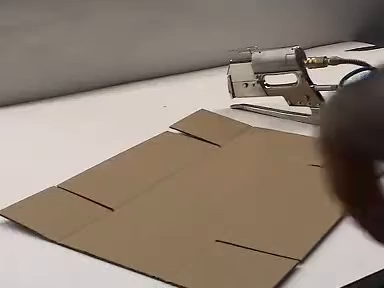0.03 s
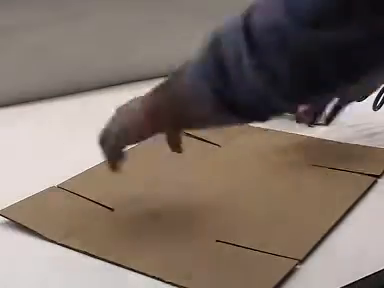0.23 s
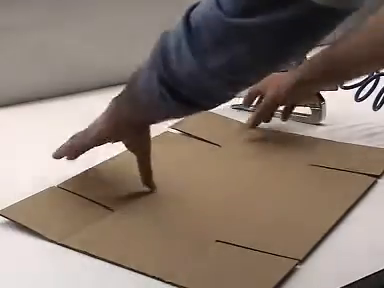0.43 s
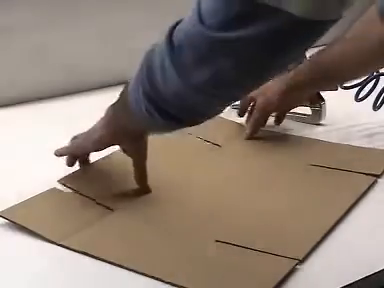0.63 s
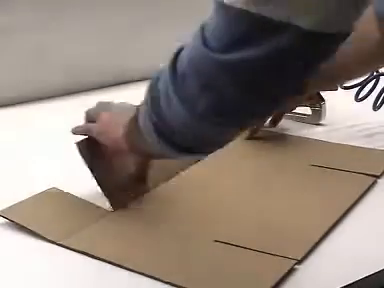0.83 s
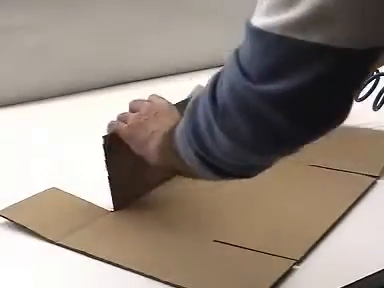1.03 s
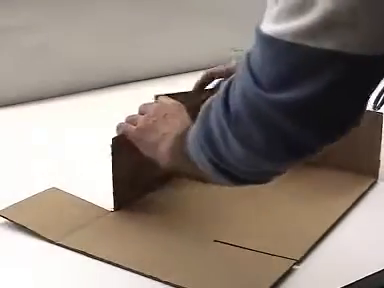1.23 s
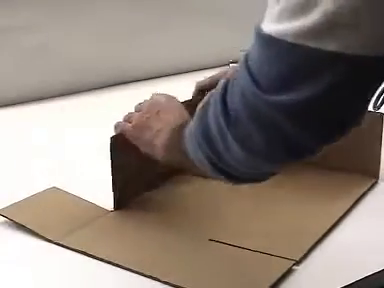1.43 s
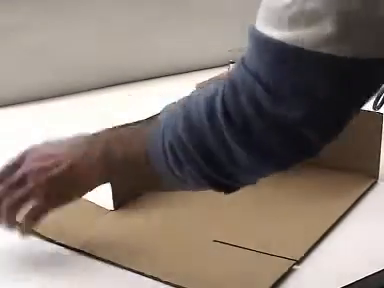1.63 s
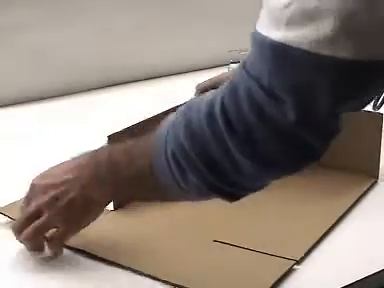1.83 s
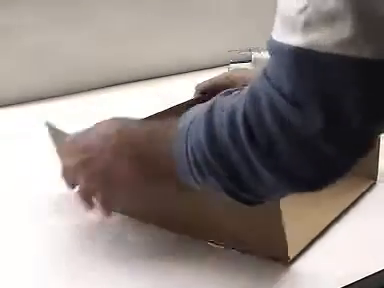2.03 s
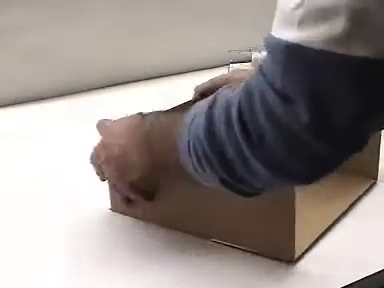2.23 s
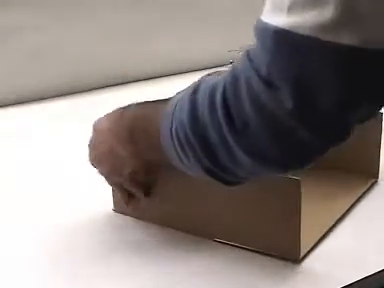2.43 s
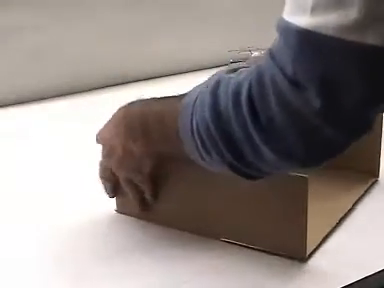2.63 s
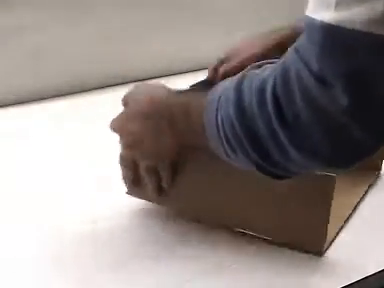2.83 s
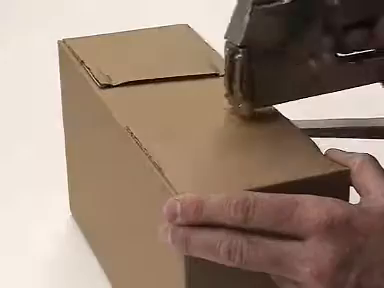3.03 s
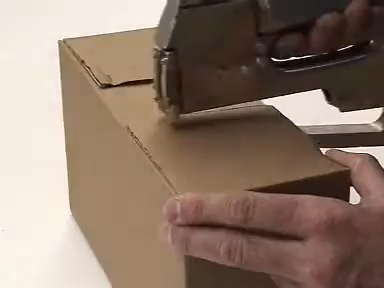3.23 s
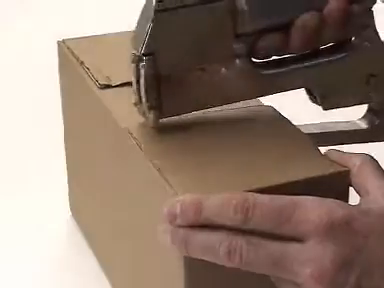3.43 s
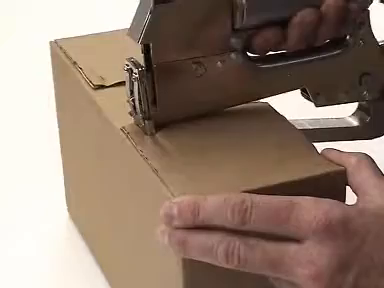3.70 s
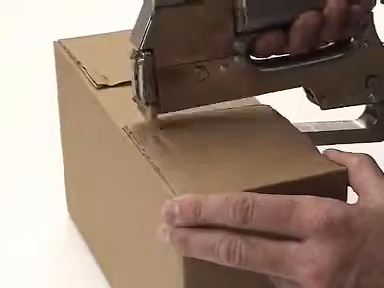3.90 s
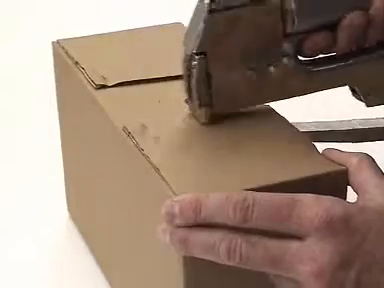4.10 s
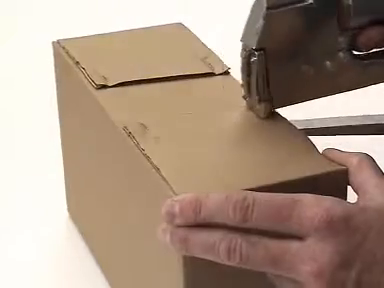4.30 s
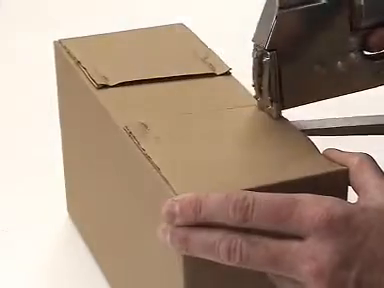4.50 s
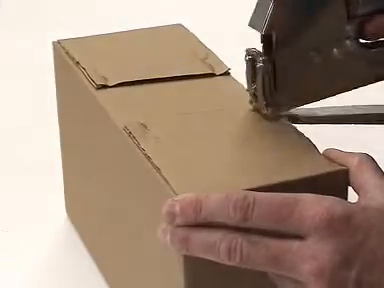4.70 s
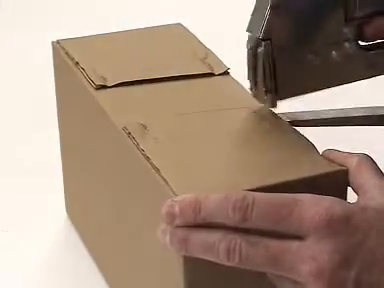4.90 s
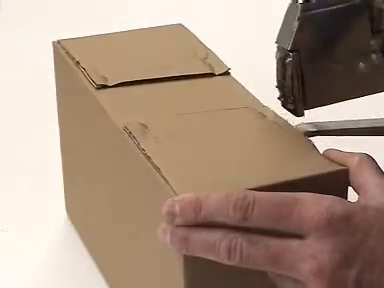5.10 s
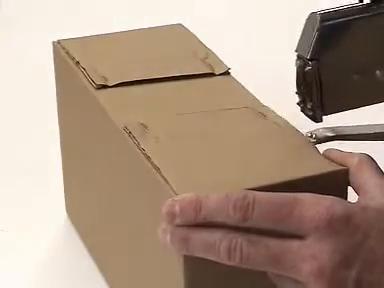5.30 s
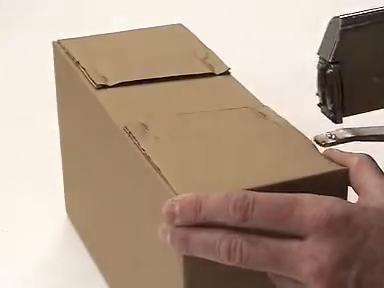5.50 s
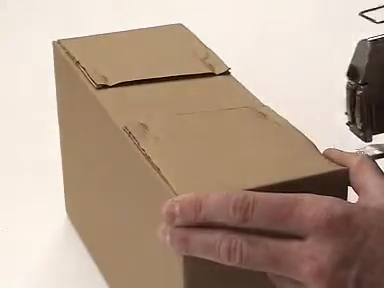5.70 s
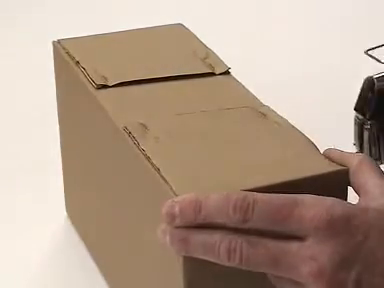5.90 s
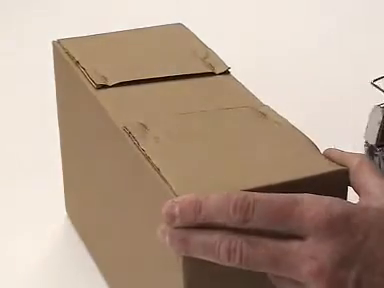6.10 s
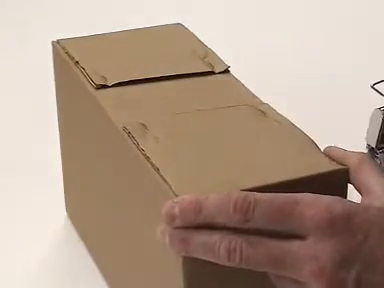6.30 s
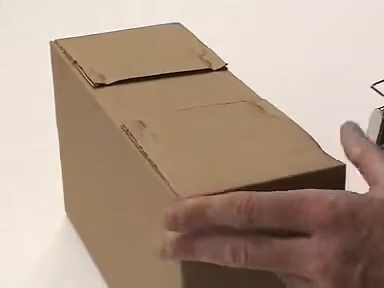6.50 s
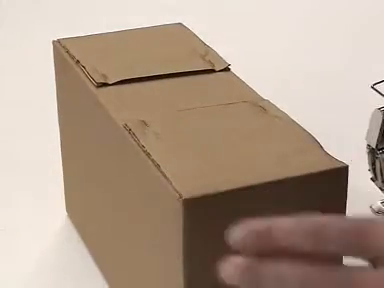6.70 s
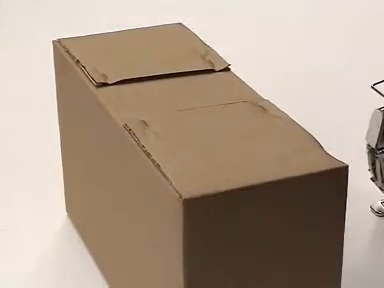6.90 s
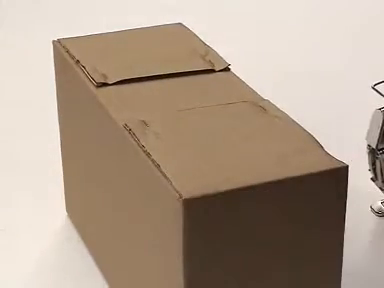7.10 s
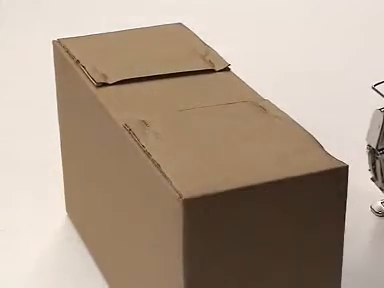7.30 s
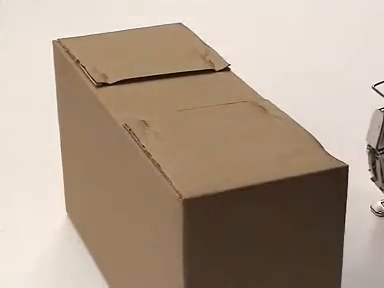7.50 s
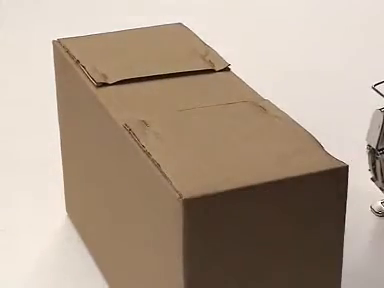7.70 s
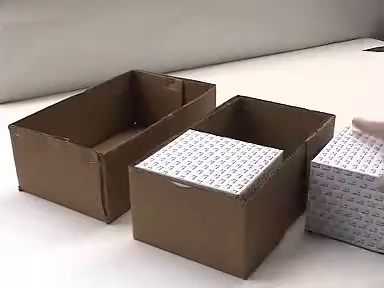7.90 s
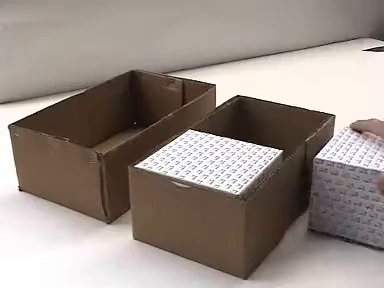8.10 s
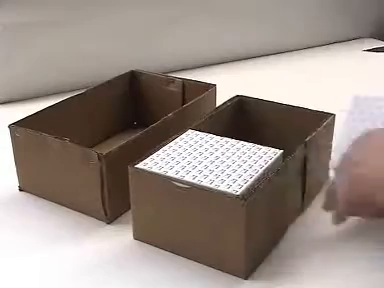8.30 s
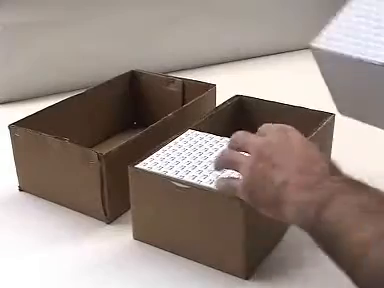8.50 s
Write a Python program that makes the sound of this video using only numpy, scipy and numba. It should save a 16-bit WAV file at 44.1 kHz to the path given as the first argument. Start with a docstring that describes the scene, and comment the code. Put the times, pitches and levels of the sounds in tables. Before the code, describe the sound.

Cardboard is folded with scrapes and two loud hollow snaps, then a pneumatic stapler fires twice with hissing exhaust in a humming workshop.

```python
"""Workshop hall, at a work table: a cardboard blank is folded into a box, creases snapping, flaps scraping.
A pneumatic stapling plier fires twice (blow, rush of air, exhaust, piston return), is laid down, and a box is set down.
Struck board, tool and table are decaying modes; sliding is random slips through resonances; air is coloured noise.
Close, narrow-band microphone, overloading on the loud hits; machines hum farther off in the hall."""
import sys
import numpy as np
from scipy import signal
from scipy.fft import rfft, irfft, next_fast_len
from scipy.io import wavfile
from numba import njit

SR = 44100
rng = np.random.default_rng(int(sys.argv[2]) if len(sys.argv) > 2 else 0)


def to_wav(sig):
    """Store sig (one row per channel, or 1-D mono) as 16-bit WAV at the path in sys.argv[1].

    Samples outside -1..1 are clipped; the rate is SR.
    """
    pcm = np.clip(np.atleast_2d(sig), -1, 1) * 32767
    pcm = np.round(pcm).astype(np.int16)
    wavfile.write(sys.argv[1], SR, pcm.T)  # frames by channels


N = 376613
T = np.arange(N) / SR
BAND_HZ, TOP_HZ = 5500, 15900  # nominal upper edge of the microphone's band; final low-pass


def amp(db):
    """Decibels to gain."""
    return 10 ** (np.asarray(db) / 20)


def unit(x):
    """Scale to rms 1."""
    return x / np.sqrt(np.mean(x ** 2))


def fade(t, t60):
    """Exponential decay from t = 0, silent before."""
    return (t >= 0) * np.exp(-np.log(1000) * np.abs(t) / t60)


def add(out, s, x):
    """Mix x into out from s seconds on."""
    i = int(s * SR)
    out[i:i + len(x)] += x[:N - i]


def thin(x, hz):
    """Small, light things radiate little below hz."""
    return signal.sosfilt(signal.butter(2, hz, "high", fs=SR, output="sos"), x)


def colour(x, points):
    """Give x a spectrum of (f/Hz, level/dB) points, rolled off above the band, at rms 1."""
    hz, db = np.transpose(points)
    size = next_fast_len(len(x))
    f = np.maximum(np.fft.rfftfreq(size, 1 / SR), 1)
    shape = amp(np.interp(np.log(f), np.log(hz), db))
    roll_off = 1 / (1 + (f / (BAND_HZ + 1000)) ** 20)
    return unit(irfft(rfft(x, size) * shape * roll_off, size)[:len(x)])


def resonate(x, hz, width):
    """One resonance, gain 1 at its centre."""
    return signal.lfilter(*signal.iirpeak(hz, hz / width, fs=SR), x)


@njit
def glide(x, hz, width):
    """A resonance whose centre moves: a state-variable band-pass, retuned at every sample."""
    y, band, low = np.empty(len(x)), 0., 0.
    for i in range(len(x)):
        g, k = np.tan(np.pi * hz[i] / SR), width / hz[i]
        v = (band + g * (x[i] - low)) / (1 + g * (g + k))
        band, low, y[i] = 2 * v - band, low + 2 * g * v, k * v
    return y


def ring(t, modes):
    """Struck (f/Hz, level/dB, t60/s) modes; each blow lands a little differently."""
    out = 0
    for hz, db, t60 in modes:
        level_chance, pitch_chance = rng.standard_normal(2)
        tone = np.sin(2 * np.pi * hz * (1 + 0.0033 * pitch_chance) * t)
        out = out + amp(db + 1.0 * level_chance) * fade(t, t60) * tone
    return out


def walk(rate):
    """Smooth chance with a spread near 1, from `rate` random points a second."""
    return 1.2 * np.interp(T * rate, np.arange(4096), rng.standard_normal(4096))


def slips(rate, spread_db):
    """Stick-slip: about `rate` random clicks a second, more unequal in size as spread_db grows."""
    clicks = (rng.random(N) < rate / SR) * rng.standard_normal(N)
    return unit(clicks * amp(spread_db * np.minimum(rng.exponential(size=N), 4)))


def stroke(s, length, change_db, grip_s=0.0063, let_go_s=0.015):
    """Gain of one sliding stroke: grip, an even change of level in dB, let go."""
    t = T - s
    grip = np.clip(t / grip_s, 0, 1)
    let_go = np.clip((length - t) / let_go_s + 1, 0, 1)
    return amp(change_db * np.clip(t / length, 0, 1)) * grip * let_go


# air of the hall, spectrum: (f/Hz, relative level/dB)
HALL_AIR = [(15, -50), (25, -11.5), (146, -3.5), (174, -6), (273, -7), (319, -10), (460, -7.5), (570, -11),
            (623, -10.5), (797, -12.5), (900, -10.5), (1250, -9), (1390, -11.5), (1560, -10.5), (1850, -15),
            (2380, -18.5), (5200, -23), (6760, -44), (11400, -120)]
# distant machine tones: (f/Hz, mean rms level/dB)
MACHINE_TONES = [(150, -57), (1200, -55), (1280, -55.5), (1502, -56.5)]
# two chirps on every turn of a distant machine: (t after the turn begins/s, f/Hz, level/dB)
TURN_CHIRPS = [(0, 1540, -42.5), (.022, 1270, -43)]
TURNS_PER_S, TURN_BEGINS_S, CHIRP_S, CHIRP_WIDTH_HZ = 11.95, 7.053, .008, 180


def hall(air_db=-41.5, waver_db=0.36, hum_waver_db=3):
    """Ventilation noise, the wavering tones of distant machines and the chirping of one that turns."""
    out = colour(rng.standard_normal(N), HALL_AIR) * amp(air_db + waver_db * walk(3.7))
    for hz, db in MACHINE_TONES:
        level = amp(db + hum_waver_db * walk(6.1)) * np.sqrt(2)
        out = out + level * np.sin(2 * np.pi * hz * T + 1.1 * walk(9))
    for lag, hz, db in TURN_CHIRPS:
        # time from the nearest chirp
        off_s = (((T - TURN_BEGINS_S - lag) * TURNS_PER_S + .5) % 1 - .5) / TURNS_PER_S
        narrowed = resonate(rng.standard_normal(N), hz, CHIRP_WIDTH_HZ)
        squeak = unit(resonate(narrowed, hz, 2 * CHIRP_WIDTH_HZ))
        out = out + amp(db) * np.exp(-(off_s / CHIRP_S) ** 2) * squeak
    return out


# hiss of the fibres, spectrum: (f/Hz, relative level/dB)
FIBRE_HISS = [(100, -29), (400, -9), (1000, 4), (1600, 2.5), (2200, 0.5), (2900, 0), (3600, -1.5),
              (5500, -8.5)]


def rubbing(strokes, resonances, judder_db, flex, low_hz):
    """Coarse slips shake the board's resonances, which wander as it flexes; fine ones hiss; the hand judders both."""
    body_gain, hiss_gain = np.zeros(N), np.zeros(N)
    for s, length, body_db, hiss_db, change_db in strokes:
        gain = stroke(s, length, change_db)
        body_gain += amp(body_db) * gain
        hiss_gain += amp(hiss_db) * gain
    coarse, body = slips(rate=2500, spread_db=1.5), 0
    for hz, width, db in resonances:
        centre = hz * np.exp(flex * walk(25))
        body = body + amp(db) * glide(coarse, centre, float(width))
    body = unit(thin(body, hz=low_hz))
    hiss = colour(slips(rate=8400, spread_db=0.0) + 0.55 * coarse, FIBRE_HISS)
    return unit(amp(judder_db * walk(110))) * (body_gain * body + hiss_gain * hiss)


# board sliding on board: (t/s, length/s, body level/dB, fibre hiss level/dB, change over the stroke/dB)
FOLDING_STROKES = [(0, 0.17, -38.5, -35.5, -14.5), (.63, 0.11, -36.5, -37.5, -6.5),
                   (.86, 0.066, -42, -40.5, 2), (.935, 0.25, -38, -32.5, -9), (1.185, 0.22, -39, -42, -5),
                   (1.335, 0.042, -15.5, -24, -0.5), (1.385, .115, -25.5, -20.5, -2.5),
                   (1.505, 0.095, -25.5, -22, 2), (1.6, 0.097, -23, -25.5, -11.5),
                   (1.845, .06, -39.5, -27.5, -5), (1.89, 0.12, -34.5, -44, -4.5),
                   (2.03, 0.026, -38, -27, 1.5), (2.06, 0.19, -35.5, -39, 2.5),
                   (2.213, 0.047, -15.5, -15.5, -11), (2.265, 0.29, -19, -38.5, -14),
                   (2.535, 0.21, -30, -35, -4), (2.76, 0.206, -34, -30, -1), (2.89, 0.042, -24, -54, -8.5)]
# resonances of the open blank: (f/Hz, width/Hz, relative level/dB)
BLANK_RESONANCES = [(130, 90, -9.5), (260, 65, -2.5), (492, 118, 20), (650, 150, -6), (960, 200, -8),
                    (1420, 210, -18.5)]


def folding():
    """The open blank rubs on itself while it is folded, its resonances wandering widely."""
    return rubbing(FOLDING_STROKES, BLANK_RESONANCES, judder_db=1.0, flex=0.1, low_hz=110)


# an edge or a hand dragged along a panel:
# (t/s, length/s, first f/Hz, last f/Hz, width/Hz, level/dB, change over the stroke/dB, overtone level/dB)
PANEL_SWIPES = [(0.218, 0.1, 1170, 1070, 610, -35.5, -3.5, -22),
                (1.345, 0.039, 1570, 1376, 80, -14.5, -2, -13), (1.383, .165, 1420, 1420, 130, -20, -11, 8),
                (1.327, .16, 350, 305, 110, -23, -5, -11.5), (1.45, 0.023, 1520, 1500, 250, -15.5, -6, -16),
                (1.809, 0.039, 1700, 2000, 755, -35.5, 11, -8),
                (1.843, .11, 2240, 1380, 596, -23.5, -2.5, -10),
                (1.959, 0.1, 1350, 1210, 400, -31.5, -4.5, -9),
                (3.257, 0.1, 800, 776, 560, -30.5, -6, -14.5), (3.557, 0.097, 945, 1056, 600, -35, 3, -29),
                (6.85, 0.18, 1050, 1120, 500, -38, -9, -31)]


def swipes(judder_db=0.0, settle_share=0.42):
    """The free length of the panel changes as the contact slides and slows, and its resonance follows."""
    out = 0
    grit = signal.lfilter([1], [1, -.7], slips(rate=7000, spread_db=0.5))
    for s, length, first_hz, last_hz, width_hz, db, change_db, overtone_db in PANEL_SWIPES:
        # settle_share: time constant of the glide as a share of the swipe's length
        travel = np.clip(T - s, 0, length) / (settle_share * length)
        centre = last_hz + (first_hz - last_hz) * np.exp(-travel)
        fundamental = glide(glide(grit, centre, float(width_hz)), centre, 4. * width_hz)
        overtone = glide(grit, 2 * centre, 2. * width_hz)
        sung = unit(fundamental + amp(overtone_db) * overtone)
        out = out + amp(db) * stroke(s, length, change_db) * sung
    return out * unit(amp(judder_db * walk(120)))


# modes of a panel: (multiple of its pitch, level/dB, share of the ring time)
PANEL_MODES = [(1, 0.5, 0.75), (.8, -24, 0.28), (1.22, -12.5, 1.4), (.55, -19.5, 0.66), (1.75, -11.5, 0.54),
               (2.7, -16, 0.39)]


def panel(t, hz, t60):
    """A struck cardboard panel rings like a slack drum."""
    return ring(t, [(hz * k, db, t60 * share) for k, db, share in PANEL_MODES])


# crack of the paper fibres, spectrum: (f/Hz, relative level/dB)
FIBRE_CRACK = [(100, -12), (500, -6.5), (1500, 1), (2500, -7.5), (4000, -5), (5500, -19.5)]


def crack_noise(t):
    """Breaking or struck fibres give noise of one colour, before any decay."""
    return colour(rng.standard_normal(len(t)), FIBRE_CRACK)


def flutes(count=5, start_s=2.582, gap_s=.025, slowing=1.05, crack_db=2.5, seated_crack_db=-11):
    """A flap edge ticks over the flutes of the board, slowing and losing its crack as it seats."""
    k = np.arange(count)
    gaps = gap_s * slowing ** k
    times = start_s + np.cumsum(gaps) - gaps
    cracks = crack_db + (seated_crack_db - crack_db) * (k / k[-1]) ** 2
    level_db, pitch_hz, t60_s = -18, 532, 0.054
    return [(s, level_db, pitch_hz, t60_s, db) for s, db in zip(times, cracks)]


# panels snapping and being tapped: (t/s, level/dB, panel f/Hz, ring t60/s, crack relative to the ring/dB)
PANEL_SNAPS = [(.461, -29, 700, .035, -13), (.551, -30, 670, .07, -18), (.599, -20, 1080, 0.022, -12),
               (.635, -31.5, 804, .03, 0.5), (.666, -24, 606, .04, -25), (1.312, 9.5, 527.5, 0.086, -19),
               (1.457, -7, 487, 0.2, -13), (1.509, -13.5, 934, 0.087, -3), (1.586, -16.5, 517, .11, -9.5),
               (2.049, -11, 510, 0.09, -18), (2.139, -11, 526, .069, -5.5), (2.182, -13, 538, 0.16, -5),
               (2.198, -5, 904, 0.029, -7), (2.205, 12, 563, 0.045, -11), (2.310, -16, 560, 0.026, -24),
               (2.530, -12, 502, 0.035, -13.5), (2.541, -16, 516, 0.039, -4), (2.905, -18, 495, 0.15, -14),
               (2.971, -14.5, 452, 0.063, -19), (3.414, -8.5, 405, 0.033, -24),
               (7.984, -11, 362, 0.03, -23), (7.997, -16, 481, 0.09, -19), (8.090, -24.5, 250, 0.14, -23),
               (8.342, -24.5, 482, 0.05, -12)]


def snaps(crack_t60=0.025):
    """A crease gives way: the fibres crack and the panel rings."""
    out, t = np.zeros(N), T[:SR // 3]
    for s, db, hz, t60, crack_db in list(PANEL_SNAPS) + flutes():
        crack = crack_noise(t) * fade(t, crack_t60)
        add(out, s, amp(db) * (panel(t, hz, t60) + amp(crack_db) * crack))
    return thin(out, hz=215)


# finished box under hand and tool: (t/s, length/s, body level/dB, fibre hiss level/dB, change over the stroke/dB)
SHIFTING_STROKES = [(3.0, 0.11, -40, -59, -3.5), (3.105, 0.33, -35.5, -46.5, -4),
                    (3.44, .17, -35.5, -58, 0), (3.62, 0.047, -42, -44, 7), (4.2, 0.055, -35.5, -41, 5),
                    (4.26, 0.18, -27, -33, -17.5), (6.46, 0.22, -35, -54, -1.5),
                    (8.03, 0.13, -35.5, -49, 1.5), (8.19, .06, -42.5, -44.5, 4),
                    (8.255, 0.051, -30, -40.5, -2), (8.31, 0.16, -35.5, -44, -7)]
# resonances of the hollow box: (f/Hz, width/Hz, relative level/dB)
BOX_RESONANCES = [(96.4, 40, -3.5), (203, 63, -5), (293, 95, -2.5), (440, 42, 7), (514, 82, -4),
                  (895, 190, -32)]


def shifting():
    """The finished box slides; its hollow resonances hold steadier than those of the open blank."""
    return rubbing(SHIFTING_STROKES, BOX_RESONANCES, judder_db=2.0, flex=0.018, low_hz=75)


# modes of the table top: (f/Hz, level/dB, t60/s)
TABLE_MODES = [(93, -7.5, 0.48), (183.3, -6.5, 0.58), (237, -8, 0.22), (305, -15, 0.059), (393, -12, .08),
               (446, -28, 1), (484, 6.5, 0.22), (590, -6.5, 0.14), (696, -9, 0.3), (1207, -16.5, 0.93)]
# clack of the contact, spectrum: (f/Hz, relative level/dB)
CONTACT_CLACK = [(30, -15.5), (120, 2.5), (450, 0.5), (1000, -9.5), (2000, -9.5), (3500, -20), (5500, -33)]
# plier and boxes bump against the table: (t/s, level/dB, clack relative to the boom/dB)
TABLE_KNOCKS = [(3.411, -29.5, 5.5), (6.233, -29.5, 11), (6.243, -27, 11.5), (6.255, -23.5, 9),
                (6.277, -28.5, 4), (6.297, -30, 8), (6.615, -33, -3), (6.637, -34, 0.5), (7.985, -32, 4.5)]


def knocks(clack_t60=0.048, rattle_db=-13, rattle_t60=0.62):
    """Plier and boxes meet the table: a clack of contact and a dying rattle over the boom of the top."""
    out, t = np.zeros(N), T[:SR]
    for s, db, clack_db in TABLE_KNOCKS:
        decay = fade(t, clack_t60) + amp(rattle_db) * fade(t, rattle_t60)
        clack = colour(rng.standard_normal(len(t)), CONTACT_CLACK) * decay
        add(out, s, amp(db) * (ring(t, TABLE_MODES) + amp(clack_db) * clack))
    return thin(out, hz=60)


def box_thump(t):
    """The box panel thumps when the driver or the returning piston shakes it."""
    return panel(t, hz=405, t60=0.061)


# modes of the plier and of the box in its jaws: (f/Hz, level/dB, t60/s)
PLIER_MODES = [(335, -18, 0.039), (403, -12, 0.11), (440, -4, 0.42), (577, -12.5, 0.38), (717, -12.5, 0.26),
               (809, -8.5, 0.25), (873, -16, 0.39), (1005, -8, 0.34), (1243, -11, .3), (1334, -18, 0.35),
               (1800, -19.5, 0.64), (2008, -19.5, 0.5), (2100, -17, 0.47), (4750, -22, 0.44)]


def blow(t, crack, ring_db, crack_db, thump_db=2.5, table_db=-19):
    """The driver slams the staple home: fibres crack, tool and box ring, the table shakes."""
    tool = amp(ring_db) * ring(t, PLIER_MODES) * (1 - fade(t, 0.052))  # the modes take time to build
    shaken = amp(thump_db) * box_thump(t) + amp(table_db) * ring(t, TABLE_MODES)
    return tool + amp(crack_db) * crack * fade(t, 0.064) + shaken * (1 - fade(t, .012))


# roar of the air and of the shaken tool, spectrum: (f/Hz, relative level/dB)
AIR_ROAR = [(30, -26), (100, -9.5), (180, -4), (280, -10), (450, 0.5), (950, -1.5), (1350, -8.5),
            (2100, -3), (2800, -9), (4000, -10.5), (5500, -17.5)]


def air_rush(t, air, open_s, t60, low_hz, high_hz, roar_db, low_width=150, high_width=120, high_db=0, swell_s=0.023):
    """Rushing air sounds two cavity resonances under a broad roar until the valve shuts it off."""
    low = unit(resonate(resonate(air, low_hz, low_width), low_hz, 4 * low_width))
    high = unit(resonate(resonate(air, high_hz, high_width), high_hz, 4 * high_width))
    cavity = unit(low + amp(high_db) * high)
    roar = colour(rng.standard_normal(len(t)), AIR_ROAR)
    valve = np.minimum(t / swell_s, 1) * np.clip((open_s - t) / .004 + 1, 0, 1)
    return valve * fade(t, t60) * (cavity + amp(roar_db) * roar)


# exhaust jet, spectrum: (f/Hz, relative level/dB)
EXHAUST_JET = [(150, -18.5), (500, -27.5), (1200, -13), (2200, -7.5), (3300, -8), (4700, -6), (5500, -12)]


def exhaust(t, jet, port, travel_s, swell_db, spit_db=3, vent_t60=0.6):
    """The port opens with a spit; the jet swells until the piston is home, then dies away."""
    swell = amp(np.interp(t, [0, travel_s], [-swell_db, 0]))
    flow = swell * fade(np.maximum(t - travel_s, 0), vent_t60)
    return amp(spit_db) * port * fade(t, 0.1) + flow * colour(jet, EXHAUST_JET)


def exhaust_puff(t, air):
    """A low puff of air as the port opens."""
    return colour(air, [(25, 8), (70, -4.0), (200, -30), (1000, -72)]) * fade(t, 0.072)


def piston_return(t, crack, seat_db=-9, ring_db=-12, thump_db=-5):
    """The piston seats with a tick and shakes tool and box once more."""
    shake = amp(ring_db) * ring(t, PLIER_MODES) + amp(thump_db) * box_thump(t)
    return shake + crack * (fade(t, 0.16) + amp(seat_db) * fade(t, 0.013))


def anvil_arm(t, hz=150.0, t60=1.78):
    """Freed from the box, the long anvil arm hums on."""
    return np.sin(2 * np.pi * hz * t) * fade(t, t60)


# staple shots: (fire t/s, trigger release t/s, piston home t/s, crack level/dB, ring level/dB, rush level/dB,
# rush t60/s, low resonance f/Hz, high resonance f/Hz, roar relative to the resonances/dB, exhaust level/dB,
# exhaust swell/dB, return level/dB)
STAPLE_SHOTS = [(3.669, 3.884, 3.959, 0.5, 3, -5.5, 0.86, 705, 1304, 4.5, -14, 10.5, -13.5),
                (4.695, 4.919, 4.982, -3, -10, -3.5, 0.67, 536, 1272, -5.5, -18, 3, -13.5)]


def stapler(leak_db=-36, leak_lead_s=0.023, puff_db=-12, arm_db=-32):
    """The driver slams home, air rushes until the trigger is let go, then the cylinder vents and the piston returns."""
    out, draught, t = np.zeros(N), np.zeros(N), T[:int(1.5 * SR)]
    for (fire, release, home, crack_db, ring_db, rush_db, rush_t60, low_hz, high_hz,
         roar_db, vent_db, swell_db, home_db) in STAPLE_SHOTS:
        air, jet = rng.standard_normal((2, len(t)))
        crack, port = crack_noise(t), unit(resonate(jet, 4500, 700))
        # the trigger valve starts to leak just before the blow
        add(out, fire - leak_lead_s, amp(leak_db) * port * fade(t, 0.26))
        add(out, fire, blow(t, crack, ring_db, crack_db))
        rush = air_rush(t, air, release - fire, rush_t60, low_hz, high_hz, roar_db)
        add(out, fire, amp(rush_db) * rush)
        add(out, release, amp(vent_db) * exhaust(t, jet, port, home - release, swell_db))
        add(draught, release, amp(vent_db + puff_db) * exhaust_puff(t, air))
        add(out, home, amp(home_db) * piston_return(t, crack))
        add(out, home, amp(arm_db) * anvil_arm(t))
    return thin(out, hz=85) + draught  # the low puff keeps its bass


def room(x, wet_db, low_db=-8, low_t60=1.0, high_t60=0.88, build_s=0.0044):
    """The workshop's diffuse echo: decaying noise, weaker but slower to die below 1000 Hz than above."""
    t = T[:int(1.5 * SR)]
    low_pass = signal.butter(2, 1000, fs=SR, output="sos")
    low = signal.sosfilt(low_pass, rng.standard_normal(len(t)))
    high = thin(rng.standard_normal(len(t)), hz=1000)
    tail = amp(low_db) * low * fade(t, low_t60) + high * fade(t, high_t60)
    tail = tail * np.minimum(t / build_s, 1)
    return amp(wet_db) * signal.fftconvolve(x, tail / np.sqrt(np.sum(tail ** 2)))[:N]


def scene():
    """Work at the table, its echo and the hall behind it."""
    background = hall()
    handling = folding() + swipes() + snaps() + shifting() + knocks()
    shots = stapler()
    echo = room(handling, wet_db=-9.5) + room(shots, wet_db=-10.5)
    return (handling + shots + echo + background)[None]


def record(dry):
    """The microphone stage clips, the band is narrowed, and the overshoot clips once more."""
    overloaded = np.clip(dry, -.71, .71)
    band = signal.butter(14, BAND_HZ + 100, fs=SR, output="sos")
    narrow = signal.sosfiltfilt(band, overloaded)
    top = signal.ellip(8, .2, 70, TOP_HZ, fs=SR, output="sos")
    return signal.sosfilt(top, np.clip(narrow, -.73, .73))


dry = scene()
out = record(dry)
to_wav(out)
```